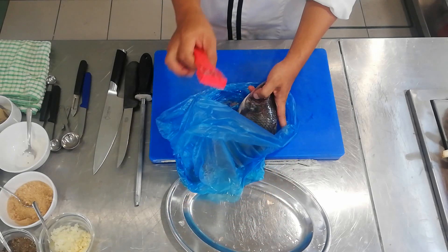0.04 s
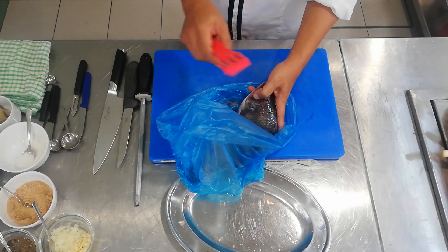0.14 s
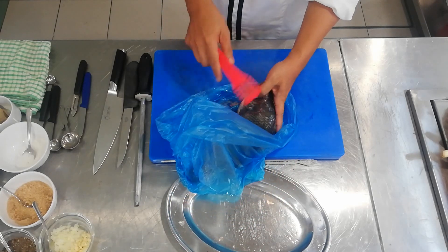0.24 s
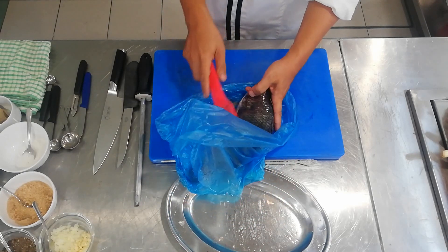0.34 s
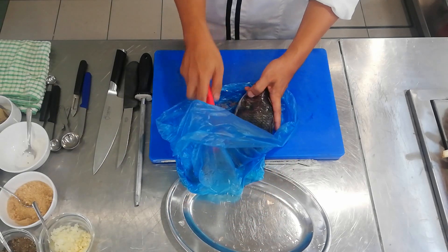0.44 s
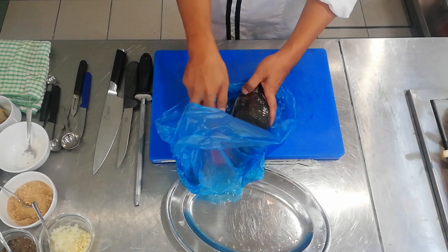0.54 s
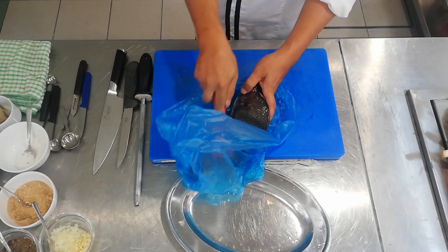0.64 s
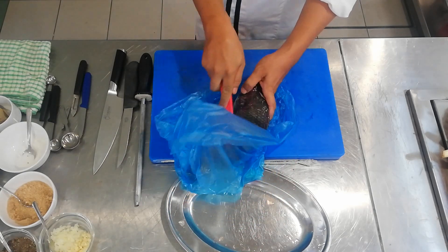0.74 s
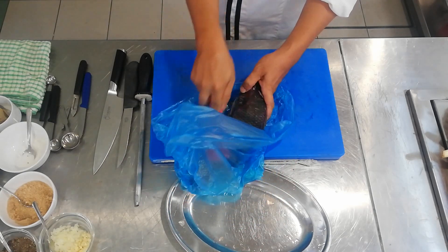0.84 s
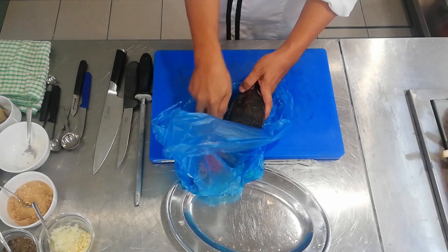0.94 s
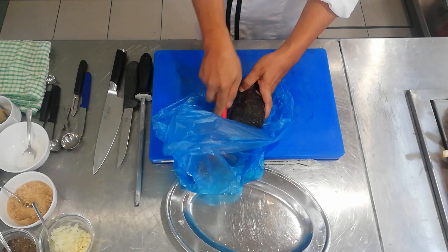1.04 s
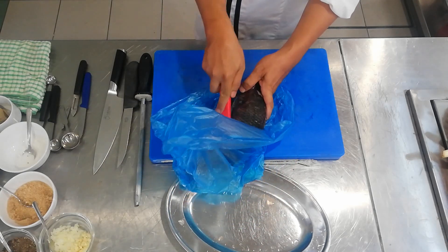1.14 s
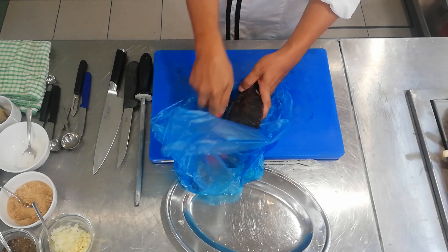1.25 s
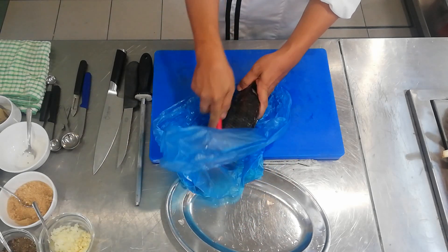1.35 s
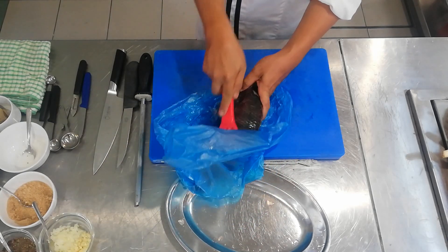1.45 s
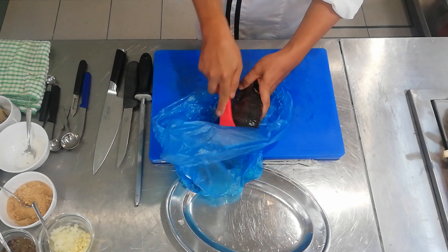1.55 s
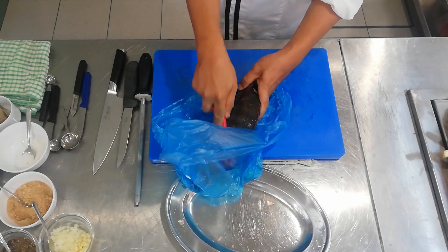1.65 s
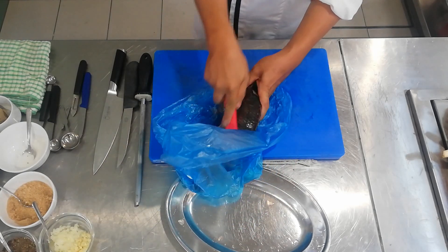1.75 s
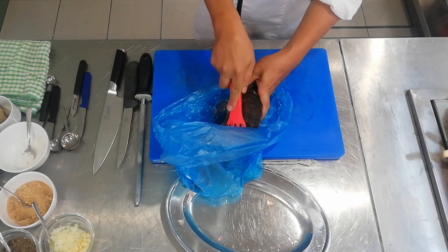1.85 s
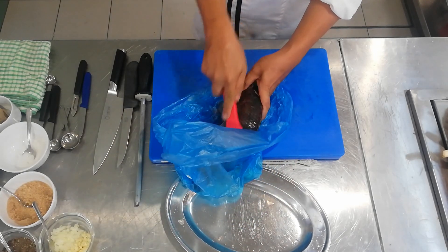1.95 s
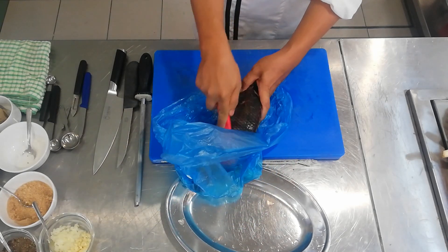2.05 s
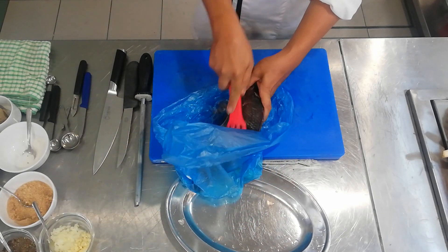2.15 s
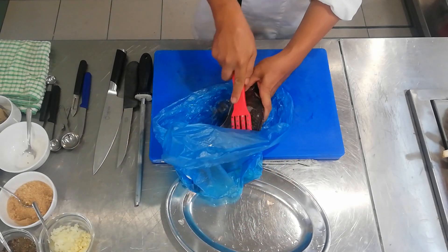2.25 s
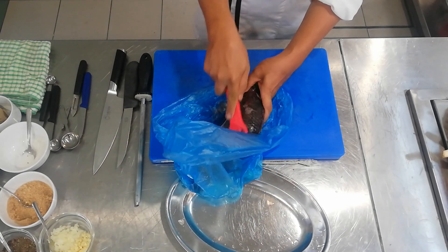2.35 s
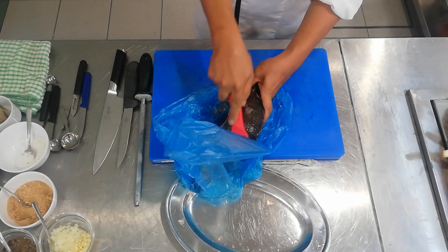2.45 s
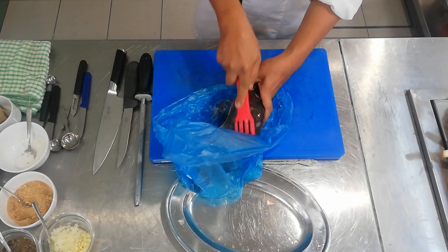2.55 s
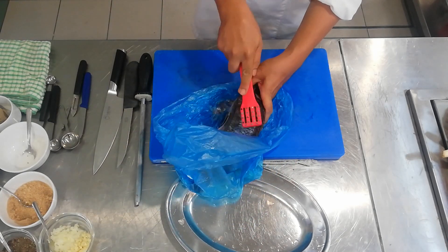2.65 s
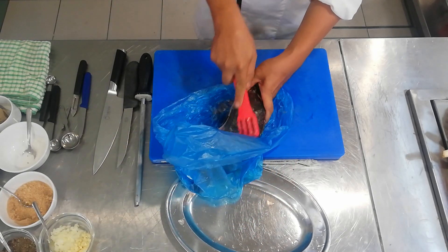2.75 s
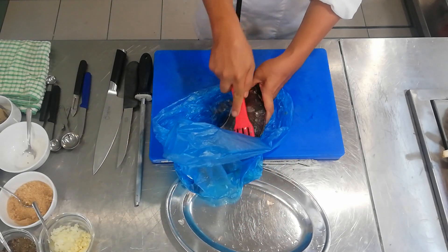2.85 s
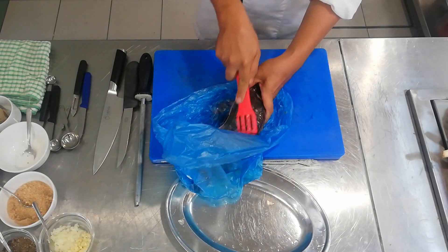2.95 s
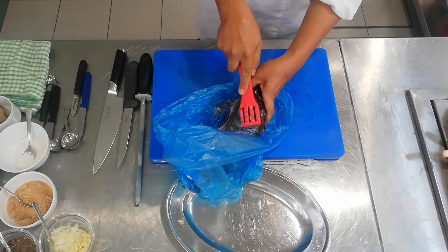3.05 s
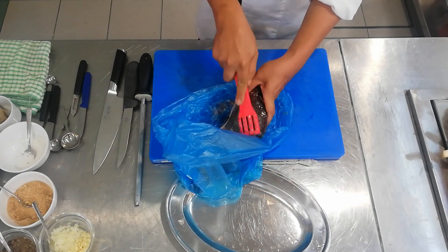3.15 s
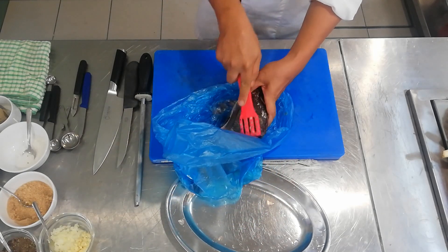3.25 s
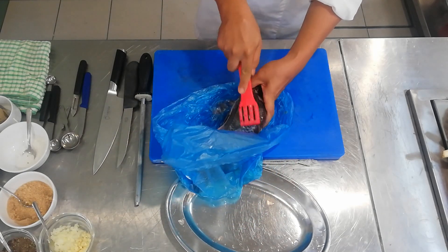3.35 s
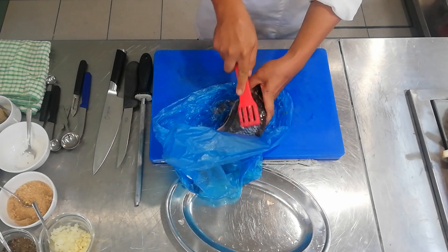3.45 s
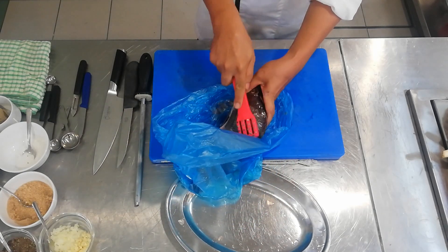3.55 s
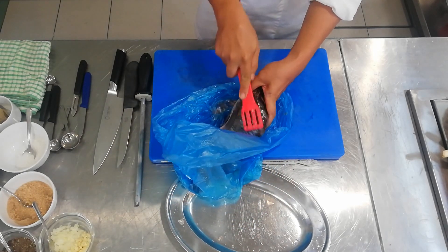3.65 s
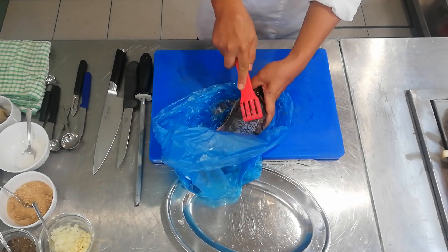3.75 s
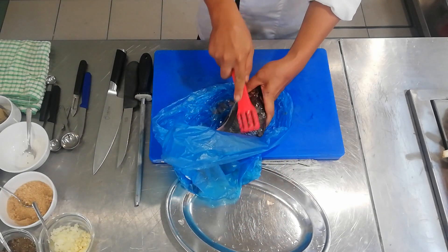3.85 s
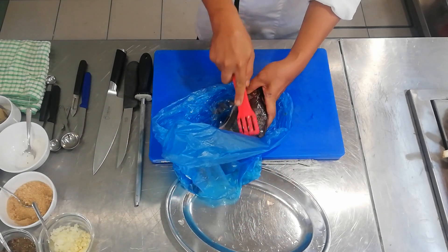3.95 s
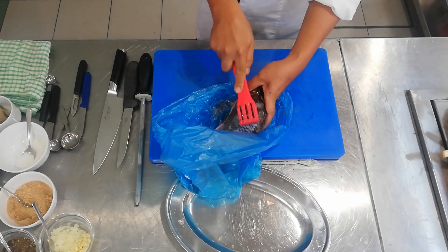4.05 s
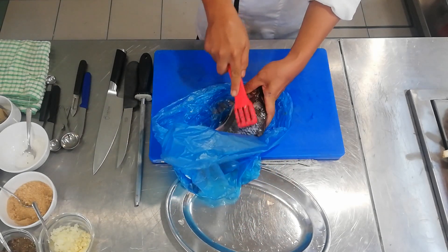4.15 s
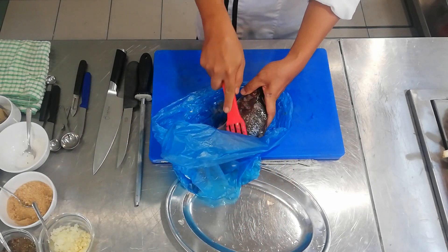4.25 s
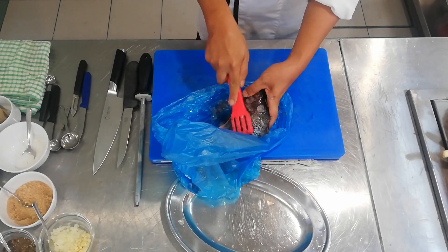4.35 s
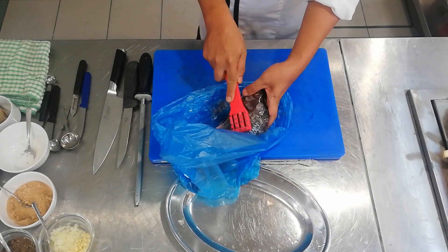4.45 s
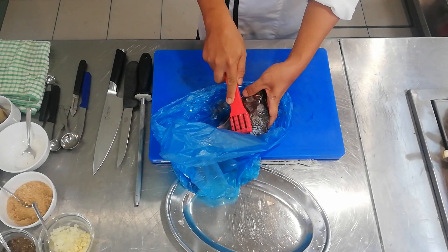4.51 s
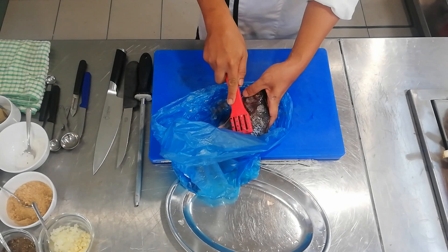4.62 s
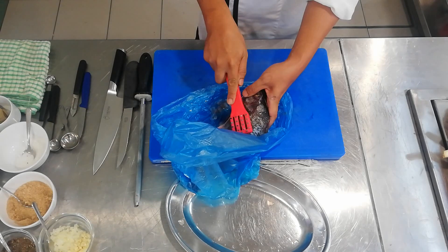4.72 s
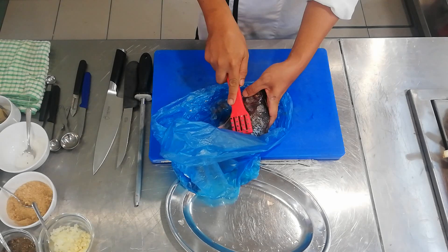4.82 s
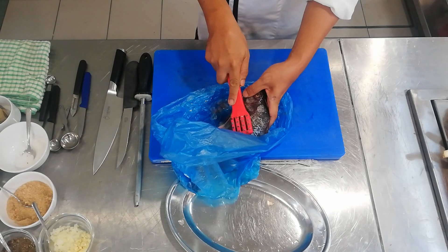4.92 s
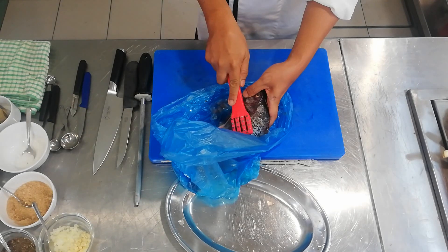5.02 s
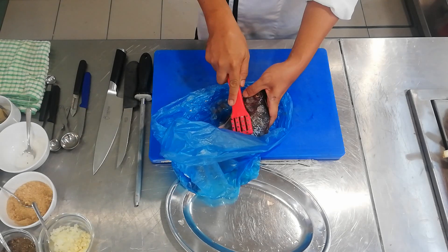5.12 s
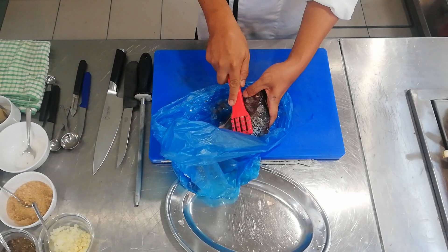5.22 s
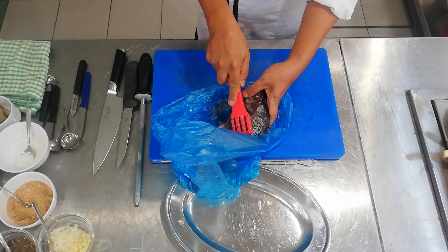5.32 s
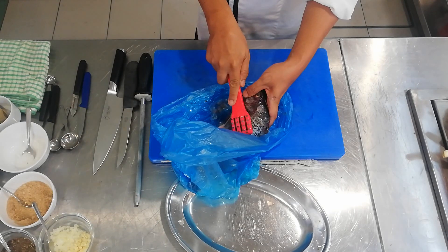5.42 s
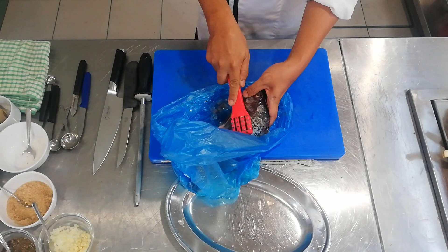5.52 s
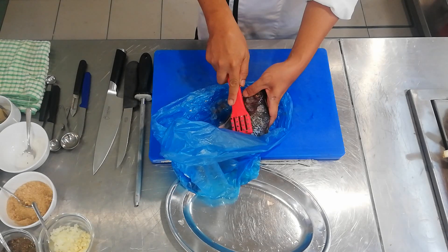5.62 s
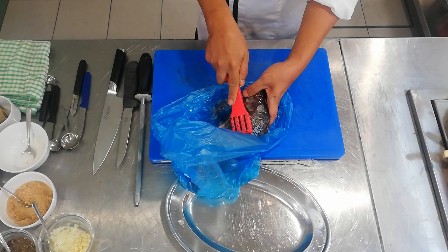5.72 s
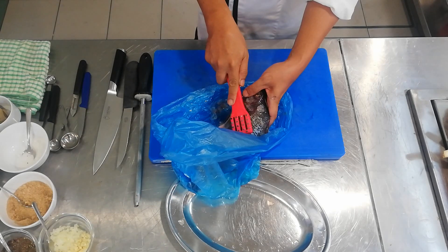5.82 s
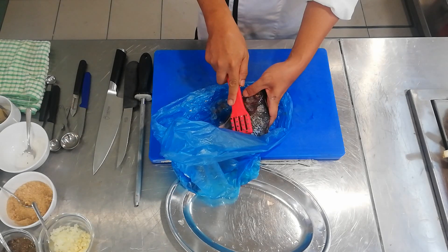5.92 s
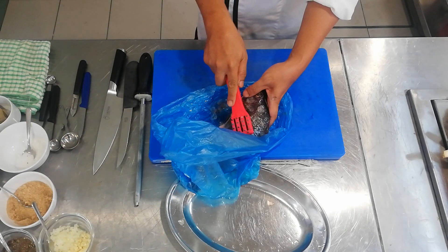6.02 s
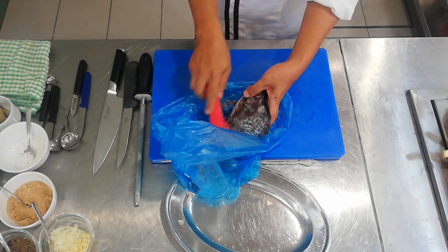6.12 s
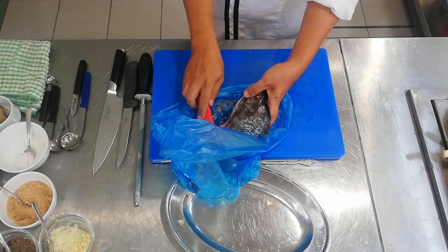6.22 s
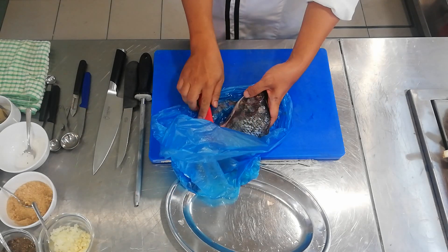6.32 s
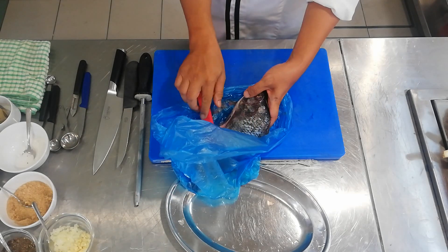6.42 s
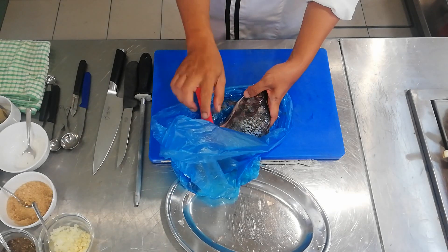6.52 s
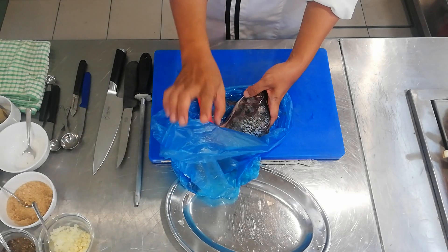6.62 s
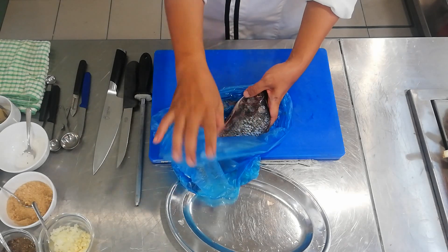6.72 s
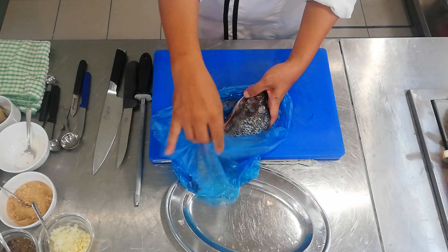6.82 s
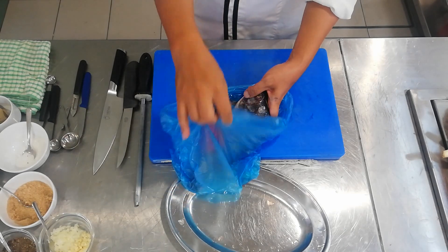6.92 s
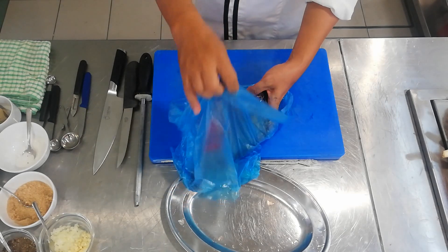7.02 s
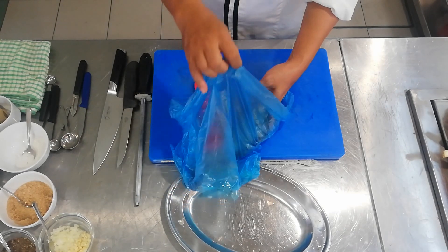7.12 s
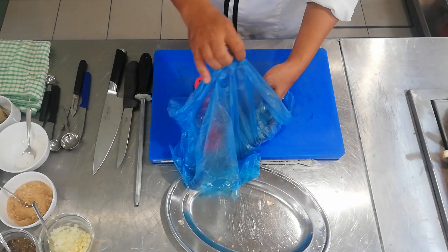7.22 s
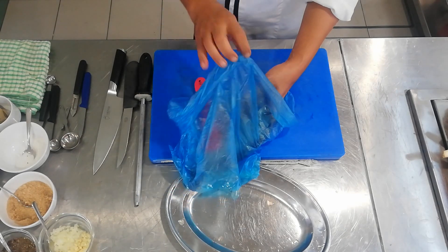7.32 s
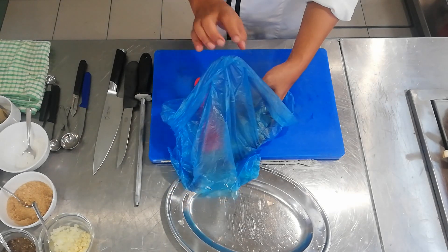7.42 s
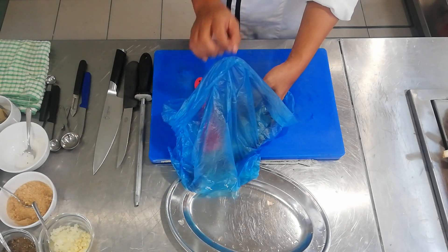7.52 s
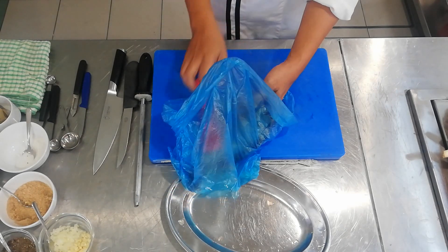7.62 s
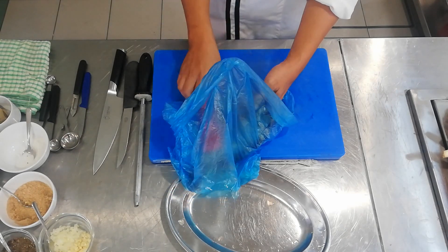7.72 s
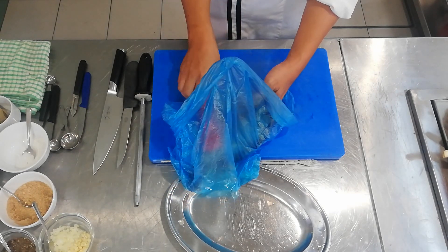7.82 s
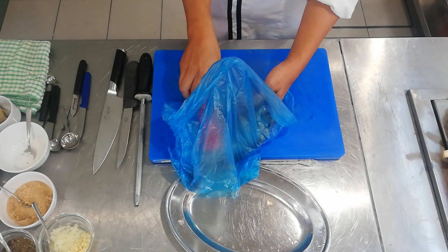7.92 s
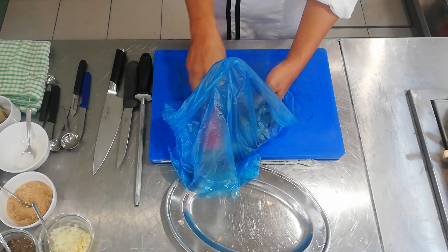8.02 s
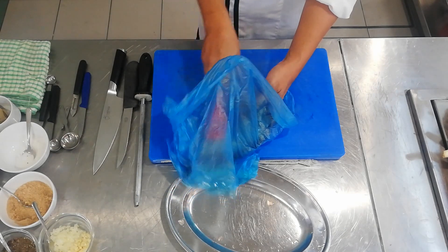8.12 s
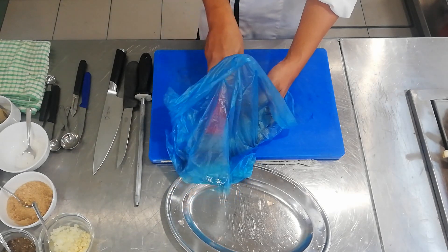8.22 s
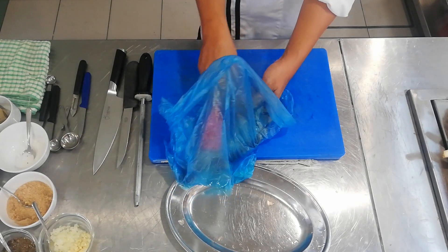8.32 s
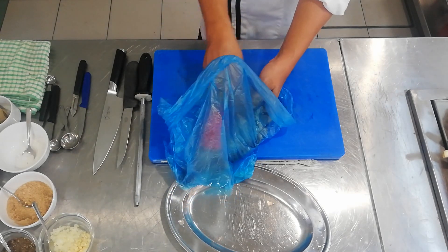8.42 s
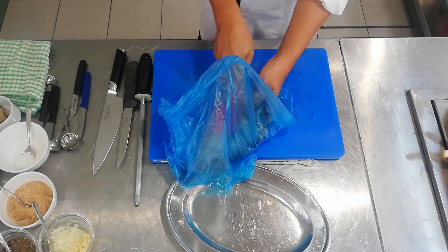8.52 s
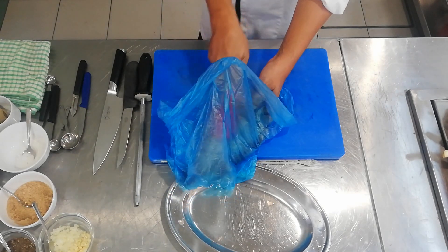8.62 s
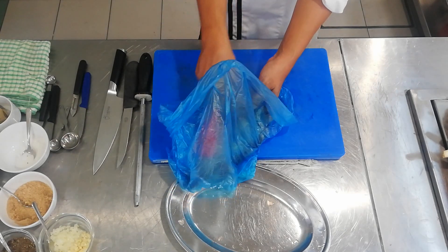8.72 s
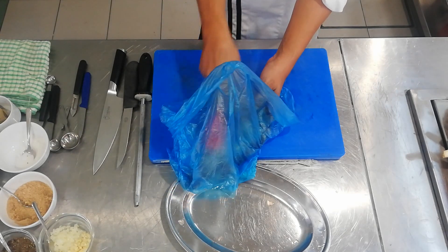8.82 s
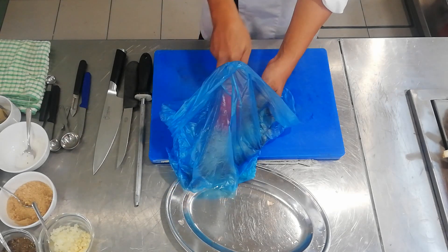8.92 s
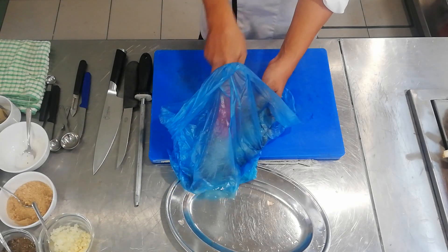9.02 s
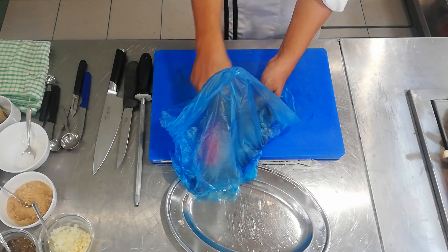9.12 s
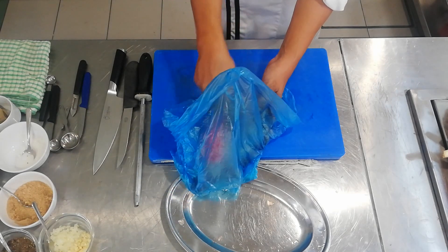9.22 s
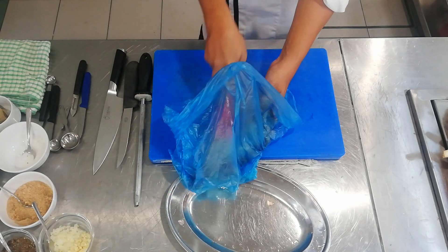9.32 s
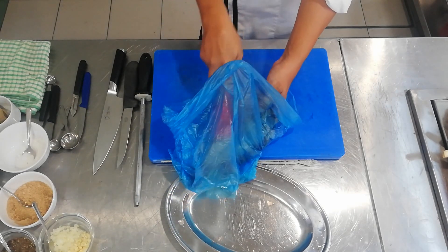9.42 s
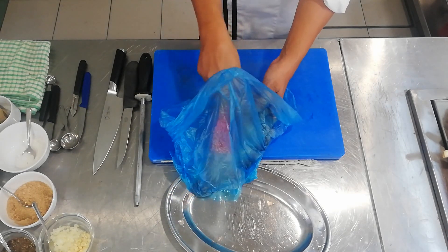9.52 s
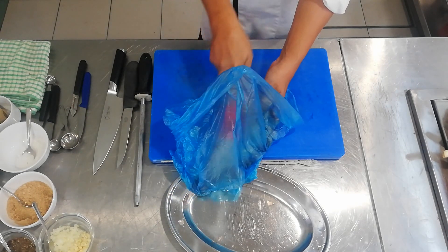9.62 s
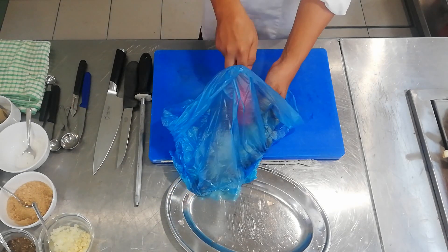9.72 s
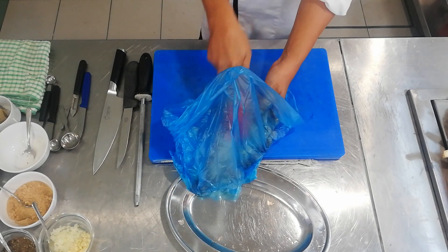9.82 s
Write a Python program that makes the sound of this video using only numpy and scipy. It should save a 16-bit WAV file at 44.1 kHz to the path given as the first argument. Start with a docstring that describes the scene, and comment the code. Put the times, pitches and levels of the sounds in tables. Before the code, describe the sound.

In a humming tiled kitchen, a scraper rasps scales off a fish in short strokes, stops while a plastic bag swishes, then resumes.

```python
"""In a tiled kitchen, a fish is scaled on a cutting board on a steel counter, with a thin plastic bag around it.
The bag swishes in dense tiny creases; each scraper stroke rasps in ticks and flicks scales loose with sharp snaps.
Dragging, bumps and wet squelches sound with the board. In a pause the tool is put down, ringing its modes,
and the bag is pulled over the fish; then the scraping goes on under it. Machines hum throughout,
as wavering tones over filtered noise."""
import sys
import numpy as np
from scipy import signal
from scipy.fft import rfft, irfft, next_fast_len
from scipy.io import wavfile

SR = 44100
rng = np.random.default_rng(int(sys.argv[2]) if len(sys.argv) > 2 else 0)


def wav_out(sig):
    """Save sig, one row per channel (or a flat mono array), as 16-bit PCM at SR to the path in sys.argv[1]."""
    wavfile.write(sys.argv[1], SR, np.round(np.clip(np.atleast_2d(sig).T, -1, 1) * 32767).astype(np.int16))


N = 434826
TIME = np.arange(N) / SR

# The scraper bears down and drags, and the board answers hollowly.
# Each row: start in seconds, length held in seconds, relative level in dB.
DRAGS = [(0.72, 0.056, -54), (0.87, 0.46, -53.5), (1.03, 0.017, -47), (1.34, 0.13, -49), (1.62, 2.85, -62),
         (8.17, 0.072, -51.5), (8.34, 0.046, -47), (8.58, 0.83, -52.5), (9.27, 0.11, -44.5),
         (9.48, 0.058, -48)]


def from_db(db):
    """Decibels to gain."""
    return 10 ** (np.asarray(db) / 20)


def rms_one(x):
    """Scale to unit power."""
    return x / np.sqrt(np.mean(x ** 2) + 1e-20)


def at_hz(points, hz):
    """Read a spectrum on a log-frequency axis."""
    known, value = np.transpose(points)
    return np.interp(np.log(hz + 1), np.log(known), value)


def response(points, size=8192):
    """Causal (minimum-phase) impulse response of a spectrum in dB, by folding its cepstrum."""
    hz = np.fft.rfftfreq(size, 1 / SR)
    cepstrum = irfft(np.log(from_db(at_hz(points, hz))))
    cepstrum[1:size // 2] *= 2
    cepstrum[size // 2 + 1:] = 0
    return irfft(np.exp(rfft(cepstrum)))


def convolve(x, impulse):
    """Pass a sound through an impulse response."""
    return signal.oaconvolve(x, impulse)[:N]


def colour(x, points):
    """Shape a white sound, keeping its power."""
    impulse = response(points)
    return convolve(x, impulse / np.linalg.norm(impulse))


def with_body(x, gain):
    """Raise or lower the body of a sound, leaving its top."""
    body = signal.lfilter(*signal.butter(1, 5960, fs=SR), x)
    return x + (gain - 1) * body


def drift(rate_hz):
    """Slow random wander of spread 1."""
    hz = np.fft.rfftfreq(N // 20, 20 / SR)
    slow = irfft(rfft(rng.standard_normal(N // 20)) / (1 + (hz / rate_hz) ** 2))
    return np.interp(np.arange(N) / 20, np.arange(len(slow)), rms_one(slow))


def resonate(x, hz, width_hz):
    """One resonance with steep skirts, from the same peak filter twice; rms 1."""
    b, a = signal.iirpeak(hz, hz / width_hz, fs=SR)
    once = signal.lfilter(b, a, x)
    return rms_one(signal.lfilter(b, a, once))


def add(track, s, sound):
    """Mix a short sound in at a time in seconds."""
    part = track[max(round(s * SR), 0):][:len(sound)]
    part += sound[:len(part)]


def grains(per_s, spread_db):
    """Tiny clicks of uneven size at random moments; their power is 1 at any rate."""
    chance = np.clip(per_s / SR, 1e-4, 1)
    sizes = from_db(spread_db * np.minimum(rng.exponential(1, N), 4))
    clicks = (rng.random(N) < chance) * sizes * rng.choice([-1, 1], N)
    return rms_one(clicks / np.sqrt(chance))


def swells(rows, attack_s, release_s):
    """Gain of a series of hand movements (start, length, dB): each grows, holds and dies away."""
    t = TIME[::32]
    each = []
    for s, length, db in rows:
        before, after = np.maximum(s - t, 0), np.maximum(t - s - length, 0)
        each.append(from_db(db) * np.exp(-before / attack_s - after / release_s))
    return np.interp(TIME, t, np.max(each, axis=0))


def dragging():
    """Strength of the scraper's drag over the board."""
    return swells(DRAGS, attack_s=0.037, release_s=0.059)


def ringing(modes):
    """Decaying sines that a body rings with after one click; modes are (Hz, dB, t60 in seconds)."""
    t = TIME[:SR // 3]
    out = np.zeros(len(t))
    for k, (hz, db, t60) in enumerate(modes):
        out += (-1) ** k * from_db(db - 60 * t / t60) * np.sin(2 * np.pi * hz * t)
    return out


def board(favoured_hz):
    """The board's ring; the place and hardness of a contact favour the modes near one pitch."""
    # The board on the steel counter.
    # Each row: mode in Hz, level in dB before the favouring, decay by 60 dB in seconds.
    modes = [(757, 1, 0.029), (885, 0, 0.036), (1150, -1.5, 0.044), (1283, -3, 0.036), (1591, 1, .04),
             (1733, 0, 0.033), (1974, 1.5, .03), (3600, 6, 0.0092)]
    fall_db_per_octave = 21
    favoured = []
    for hz, db, t60 in modes:
        octaves_away = abs(np.log2(hz / favoured_hz))
        favoured.append((hz, db - fall_db_per_octave * octaves_away, t60))
    return ringing(favoured)


def machines(rumble_db, air_db, steady_db, spacing_m):
    """Fans and compressors: steady and wavering hum over diffuse rumble and air noise."""
    # Motor hum. Each row: pitch in Hz, rms level in dB, width of its wavering in Hz.
    hum_tones = [(60.8, -41.5, 4.9), (244.8, -53, 3.1), (305.6, -54, 9.2), (863, -65.5, 6.2),
                 (1140, -67.5, 6.1)]
    # Low machine rumble. Each row: frequency in Hz, relative level in dB.
    rumble_colour = [(20, -27), (32, -14), (42, -5), (75, -3), (105, 2), (150, -6), (200, -7), (300, -14.5),
                     (400, -18.5), (550, -39), (1500, -91.5)]
    # Kitchen air noise. Each row: frequency in Hz, relative level in dB.
    air_colour = [(240, -19.5), (400, -2), (637, -4.5), (855, -4), (1340, -5.5), (1880, -5.5), (2610, -9),
                  (3610, -10), (6310, -16.5), (10700, -16), (14800, -32.5)]
    hum = from_db(steady_db) * np.sin(2 * np.pi * hum_tones[0][0] * TIME)
    for hz, db, width in hum_tones:
        phase = 2 * np.pi * hz * TIME
        hum = hum + from_db(db) * (drift(width) * np.cos(phase) + drift(width) * np.sin(phase))
    spectra = []
    for low, high in rng.standard_normal((2, 2, N)):
        rumble = from_db(rumble_db) * colour(low, rumble_colour)
        air = from_db(air_db) * colour(high, air_colour)
        spectra.append(rfft(rumble + air, next_fast_len(N)))
    mid, side = spectra
    # two spaced microphones agree only on waves longer than their spacing; sound travels 343 m/s
    alike = np.sinc(2 * np.linspace(0, SR / 2, len(mid)) * spacing_m / 343)
    shared, opposed = mid * np.sqrt((1 + alike) / 2), side * np.sqrt((1 - alike) / 2)
    return hum + irfft(shared + opposed * [[1], [-1]])[:, :N]


def bag(level_db, crumple_db):
    """Thin film slides in a fine, dense swish of creases; a light touch only hisses, a firm pull adds body."""
    # The bag is touched, pulled over the fish, let go, straightened, then brushed by the hand inside.
    # Each row: start in seconds, length held in seconds, rustle in dB before level_db.
    touches = [(0.0, 0.015, -35.5), (0.15, 0.23, -45), (0.52, 0.097, -38.5), (6.19, 0.13, -35.5),
               (6.36, 0.057, -39), (6.845, 0.04, -31), (6.93, 0.125, -24.5), (7.16, 0.02, -28.5),
               (7.32, 0.065, -35), (7.795, 0.032, -35.5), (8.22, 1.3, -39.5)]
    # Rustling film. Each row: frequency in Hz, relative level in dB.
    film_colour = [(530, -47), (900, -15.5), (2500, -13.5), (2890, -6.5), (5280, -4.5), (10500, 2.5),
                   (15100, -14)]
    rustle = swells(touches, attack_s=0.041, release_s=0.065)
    pull = np.sqrt(rustle / rustle.max())
    creases = grains(30000 * pull, spread_db=1.0)  # per second at the firmest pull
    crumpling = rms_one(from_db(crumple_db * drift(40)))
    swish = colour(creases * crumpling * rustle, film_colour)
    return from_db(level_db) * with_body(swish, pull)


def effort():
    """Strength of the rasp: in every stroke the edge settles, pushes, and slides back lightly."""
    # The edge settles on the skin, pushes against the scales, then slides back.
    # Each row: start of the push in seconds, its length in seconds, push in dB, settling in dB,
    # pause before the return in seconds, return in dB; all levels relative.
    strokes = [(0.737, 0.049, -25.5, -43, 0.076, -33), (1.074, 0.11, -27, -37.5, 0.082, -35.5),
               (1.457, 0.069, -27.5, -35, 0.079, -34), (1.796, 0.073, -26, -37, 0.12, -34),
               (2.204, 0.081, -25, -43.5, 0.11, -32.5), (2.57, 0.13, -26.5, -42.5, 0.095, -35.5),
               (3.042, 0.043, -26.5, -36.5, 0.087, -41), (3.371, 0.082, -29, -39.5, 0.069, -39.5),
               (3.774, 0.015, -26, -34, 0.091, -41.5), (4.129, 0.013, -31, -37.5, 0.088, -37),
               (4.395, 0.039, -34, -46.5, 0.1, -52.5), (8.162, 0.049, -32, -62, 0.11, -32),
               (8.541, 0.054, -28, -33, 0.085, -32), (8.926, 0.052, -25, -33.5, 0.078, -32),
               (9.335, 0.054, -26, -34.5, 0.12, -34.5), (9.683, 0.055, -24.5, -35, 0.046, -42)]
    settle_s, return_s = 0.074, 0.07
    moves = []
    for s, length, db, settle_db, pause, return_db in strokes:
        moves.append((s - settle_s, settle_s, settle_db))
        moves.append((s, length, db))
        moves.append((s + length + pause, return_s, return_db))
    return swells(moves, attack_s=0.0212, release_s=0.026)


def scraping(rasp_db, skin_db, per_s, catch_db, press_db, waver_db):
    """The edge ticks over rows of scales, faster as it presses harder, and catches unevenly, duller or brighter."""
    # Rasp on the scales. Each row: frequency in Hz, relative level in dB.
    rasp_colour = [(1500, -28.5), (3000, -8.5), (4500, -4.5), (7000, -1.5), (9000, 2.5), (11000, 0),
                   (13000, -8.5), (16000, -18)]
    # Rub on the wet skin. Each row: frequency in Hz, relative level in dB.
    skin_colour = [(400, -29), (800, -14), (1300, -18), (1600, 1), (2500, -0.5), (3500, 5.5), (5000, 5),
                   (8000, -31)]
    rasp, drag = effort(), dragging()
    # light strokes mostly rub the skin, and so do those that bear down on the board
    skin = rasp ** 0.71 * (1 + from_db(press_db) * drag / drag.max())
    catching = rms_one(from_db(catch_db * np.tanh(drift(38))))
    # from 0.18 to 1.18 times per_s
    ticks = grains(per_s * (0.18 + np.sqrt(rasp / rasp.max())), spread_db=1.0)
    body_gain = from_db(waver_db * np.tanh(drift(8.7)))
    bright = with_body(colour(ticks * rasp * catching, rasp_colour), body_gain)
    rub = .5 * ticks + grains(1500, spread_db=0.5)
    dull = colour(rub * skin * catching, skin_colour)
    return from_db(rasp_db) * bright + from_db(skin_db) * dull


def rubbing(board_hz, drag_db, squelch_db, thud_db):
    """Uneven friction rings the board and rocks it on the counter; wet skin slips in short pitched bursts."""
    # Wet skin squelches under the grip.
    # Each row: start in seconds, level in dB before squelch_db, pitch in Hz, length in seconds.
    squelches = [(1.015, -49, 890, 0.056), (3.347, -46, 1420, 0.032), (9.316, -40, 2050, 0.074)]
    drag, ring = dragging(), board(board_hz)
    gripping = rms_one(from_db(5 * np.tanh(drift(10))))
    friction = drag * gripping * grains(1500, spread_db=0.5)
    out = from_db(drag_db) * convolve(friction, ring / np.linalg.norm(ring))
    rocking = resonate(rng.standard_normal(N), hz=94, width_hz=113)
    out += from_db(thud_db) * (drag / drag.max()) ** 2 * rocking
    for s, db, hz, length in squelches:
        swell = np.hanning(round(length * SR))
        slip = rms_one(swell * resonate(rng.standard_normal(len(swell)), hz, .2 * hz))
        add(out, s, from_db(db + squelch_db) * slip)
    return out


def snaps(rows, level_db):
    """A scale lets go with one crack, coloured by its own pitch, and flutters for a moment."""
    # Snapping scales. Each row: frequency in Hz, relative level in dB.
    snap_colour = [(300, -41), (1000, -15), (2400, -12), (4000, -6), (7000, -3), (9000, -2.5), (11000, -2),
                   (13000, -12), (16000, -20.5)]
    flutter, flutter_s = 0.2, 0.0014  # strength against the crack, and decay time constant
    ring_db, ring_q = 8, 2.6  # how far the pitch stands out of the crack, and how narrowly
    t, out = TIME[:512], np.zeros(N)
    shape = response(snap_colour)[:len(t)]
    for s, peak_db, hz in rows:
        force = flutter * rng.standard_normal(len(t)) * np.exp(-t / flutter_s)
        force[0] = 1
        crack = np.convolve(force, shape)
        pitched = signal.lfilter(*signal.iirpeak(hz, ring_q, fs=SR), crack)
        crack = crack + (from_db(ring_db) - 1) * pitched
        add(out, s + .0015, from_db(peak_db + level_db) * crack / np.abs(crack).max())
    return out


def big_snaps(level_db):
    """Big scales snap loose at set moments."""
    # Each row: time in seconds (the crack starts 1.5 ms later), peak in dB before level_db, scale pitch in Hz.
    big_scales = [(0.7305, -6, 7560), (0.742, -5, 10000), (1.0605, -12.5, 11000), (1.103, -9.5, 4450),
                  (1.134, -9.5, 6500), (1.1684, -14, 6000), (1.4308, -11.5, 6500), (1.4589, 0, 11400),
                  (1.4819, -0.5, 4700), (1.5312, -11.5, 9000), (1.8228, -11, 4800), (1.838, -0.5, 7500),
                  (2.176, -5.5, 6500), (2.204, -8, 10400), (2.2336, -9, 5500), (2.278, -1.5, 9500),
                  (2.354, -11, 11000), (2.613, -6.5, 9030), (2.6638, -3.5, 8500), (2.673, -4.5, 9460),
                  (2.7018, -6, 4500), (2.7148, -11, 10500), (3.055, -11, 9000), (3.083, -4, 6500),
                  (3.1046, -11, 6990), (3.368, -13, 10550), (3.7638, -7.5, 10940), (4.125, -8.5, 5000),
                  (4.1343, 0, 6500), (4.1595, -5.5, 10000), (8.1306, -5.5, 11000), (8.53, -8.5, 8020),
                  (8.5645, -8, 9000), (8.5705, -1.5, 9500), (8.6251, -9.5, 8500), (8.9078, -6.5, 10500),
                  (8.9334, -2.5, 5550), (9.0676, -12, 10000), (9.7054, -1, 6000), (9.7286, -0.5, 7500)]
    return snaps(big_scales, level_db)


def small_snaps(level_db, per_s, spread_db):
    """Small scales flick off at random, more often and louder under a hard push, each at its own pitch."""
    rasp = effort()
    push = rasp / rasp.max()
    loose = rng.random(N) < per_s / SR * push
    size, pitch = rng.random((loose.sum(), 2)).T
    peak_db = spread_db * size ** 2 + 20 * np.log10(push[loose])
    return snaps(zip(TIME[loose], peak_db, 4500 + 7000 * pitch), level_db)


def bumps(level_db):
    """Soft, rough contacts of fish and scraper, as fading noise, ring the board and die out."""
    # Fish and scraper bump the board and judder over it.
    # Each row: start in seconds, peak in dB before level_db, favoured pitch in Hz, length in seconds.
    contacts = [(5.088, -33, 1580, 0.025), (5.778, -32.5, 1900, 0.00077), (9.185, -28.5, 814, 0.06),
                (9.255, -34.5, 846, 0.03), (9.27, -30.5, 1040, 0.0093), (9.382, -31, 1630, 0.045),
                (9.704, -25.5, 1512, 0.00093)]
    out = np.zeros(N)
    for s, db, hz, length in contacts:
        fade = np.linspace(1, 0, round(length * SR))
        ring = signal.fftconvolve(fade * rng.standard_normal(len(fade)), board(hz))
        add(out, s, from_db(db + level_db) * ring / np.abs(ring).max())
    return out


def knocks(level_db, wash_db, wash_hz, wash_width_hz, wash_t60_s):
    """Each contact rings the tool's modes, and a narrow metallic shimmer lingers."""
    # The tool is put down and bounces. Each row: start in seconds, level in dB before level_db.
    contacts = [(6.403, -9), (6.4125, -17.5)]
    # Tool on the board. Each row: mode in Hz, relative level in dB, decay by 60 dB in seconds.
    tool_modes = [(906, -11.5, 0.028), (1320, -10, 0.02), (1705, -13, 0.045), (1990, -8.5, 0.018),
                  (2540, -3, 0.011), (2970, -6, 0.02), (3390, -4.5, 0.015), (4350, -7.5, 0.0053)]
    out, ring = np.zeros(N), ringing(tool_modes)
    t = TIME[:len(ring)]
    shimmer = resonate(rng.standard_normal(len(t)), wash_hz, wash_width_hz)
    ring = ring + from_db(wash_db - 60 * t / wash_t60_s) * shimmer
    for s, db in contacts:
        add(out, s, from_db(db + level_db) * ring)
    return out


def kitchen(x, room_db):
    """Direct sound, quick echoes from counter and board, then the tiled room; paths wander as the hands move."""
    # Hard surfaces near the board.
    # Each row: left and right delay in seconds before the wander, gain.
    echoes = [(.00248, 0.00256, 0.72), (0.00066, 0.00081, 0.32), (0.0033, 0.0071, 0.45)]
    room_t60_s = 0.5
    t, out = TIME[:SR // 3], np.zeros((2, N))
    place = drift(2)
    # two room responses share the sound as the place wanders
    shares = (x * np.cos(2 * place), x * np.sin(2 * place))
    for ear in range(2):
        for echo in echoes:
            delay = (echo[ear] * SR * (1 + .05 * place)).astype(int)
            out[ear] += echo[2] * x.take(np.arange(N) - delay, mode="clip")
        for share in shares:
            onset = 1 - np.exp(-t / 0.00042)
            tail = rng.standard_normal(len(t)) * from_db(-60 * t / room_t60_s) * onset
            out[ear] += from_db(room_db) * convolve(share, tail / np.linalg.norm(tail))
    return x + out


def scene():
    """All work on the board sounds into the kitchen, over the machines."""
    hum = machines(rumble_db=-37.5, air_db=-42.0, steady_db=-40.0, spacing_m=0.32)
    film = bag(level_db=-2.0, crumple_db=1.7)
    scrape = scraping(rasp_db=-2.0, skin_db=-22.5, per_s=1500, catch_db=4.5, press_db=-2.5, waver_db=3.5)
    rub = rubbing(board_hz=1222, drag_db=-0.5, squelch_db=-1.5, thud_db=-40.0)
    cracks = big_snaps(level_db=2.5) + small_snaps(level_db=-17.0, per_s=110, spread_db=9.5)
    bumping = bumps(level_db=2.5)
    put_down = knocks(level_db=-2.5, wash_db=-32.5, wash_hz=2830, wash_width_hz=650, wash_t60_s=0.65)
    bright = kitchen(scrape + film + cracks, room_db=-3.5)
    dull = kitchen(rub + bumping + put_down, room_db=-3.5)
    return bright + dull + hum


def record(dry):
    """Each microphone has its own treble; peaks clip and the top is cut."""
    # The right microphone is the brighter one. Each row: frequency in Hz, left minus right in dB.
    balance = [(200, -0.5), (700, 1.5), (2500, 0.5), (5000, 1), (8500, 0.5), (10800, -8.5), (12300, -10.5),
               (14000, 0.5)]
    ears = []
    for x, side in zip(dry, (1, -1)):
        tilt = [(hz, side * db / 2) for hz, db in balance]
        ears.append(convolve(x, response(tilt)))
    low_pass = signal.ellip(12, .1, 80, 15800, fs=SR, output="sos")
    return signal.sosfilt(low_pass, np.clip(ears, -1, 1))


dry = scene()
out = record(dry)
wav_out(out)
```